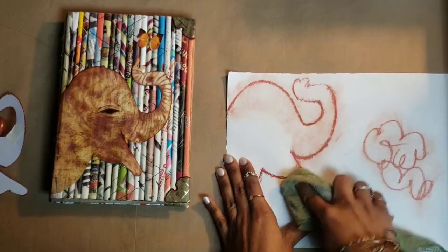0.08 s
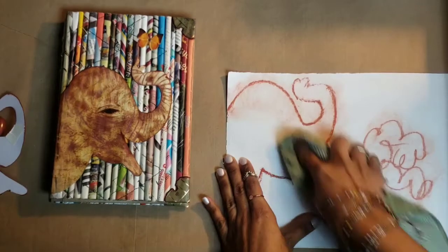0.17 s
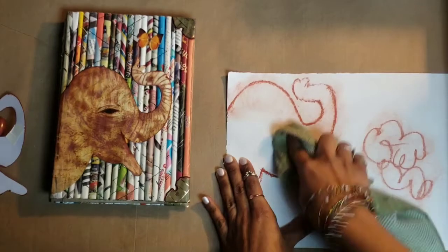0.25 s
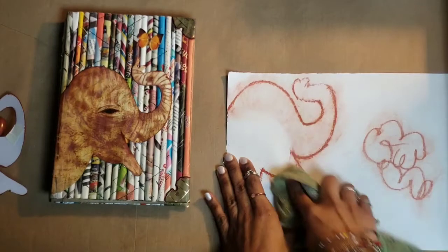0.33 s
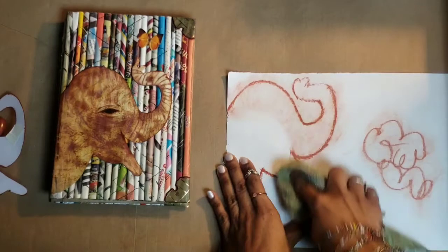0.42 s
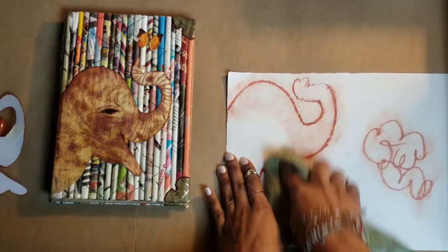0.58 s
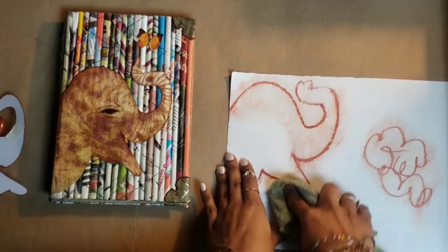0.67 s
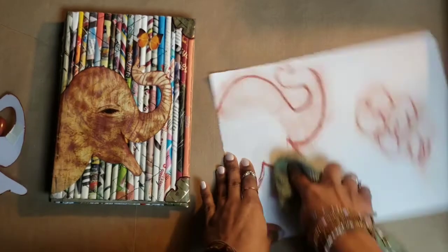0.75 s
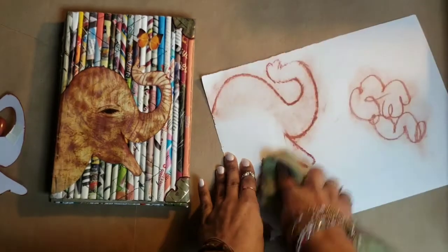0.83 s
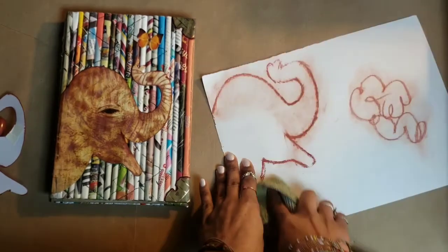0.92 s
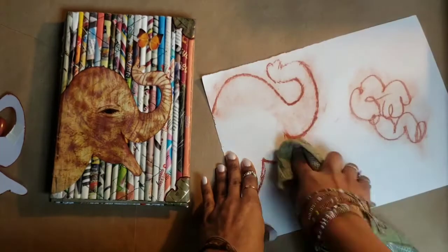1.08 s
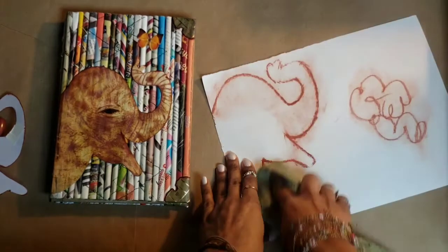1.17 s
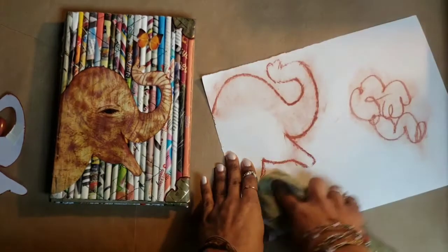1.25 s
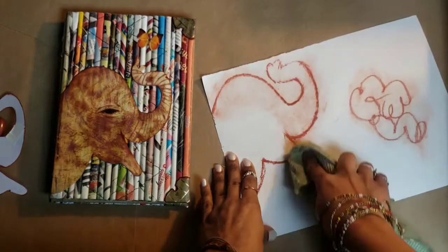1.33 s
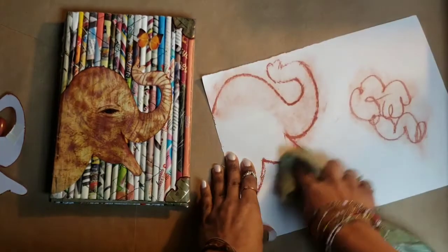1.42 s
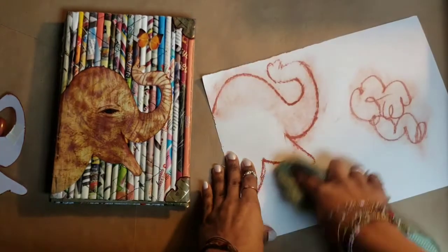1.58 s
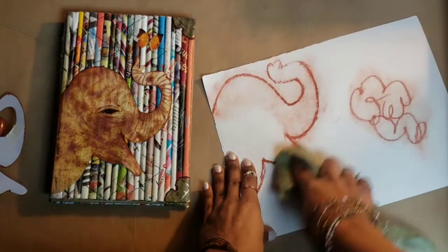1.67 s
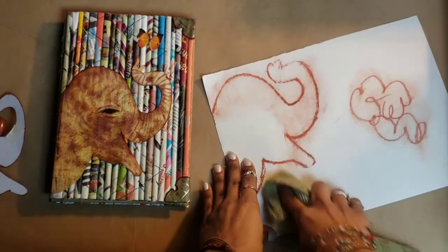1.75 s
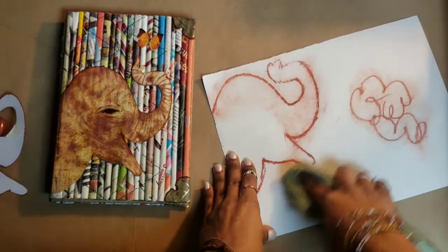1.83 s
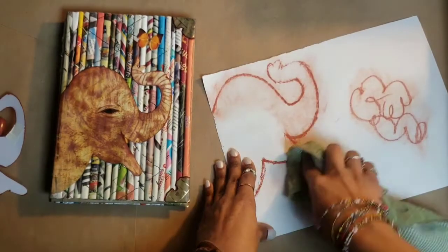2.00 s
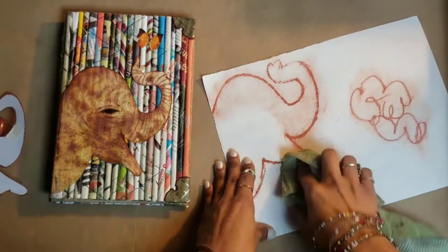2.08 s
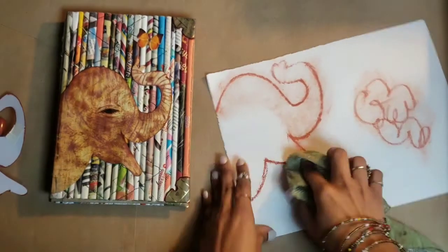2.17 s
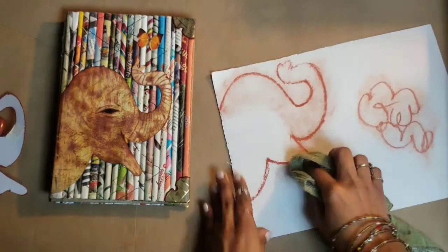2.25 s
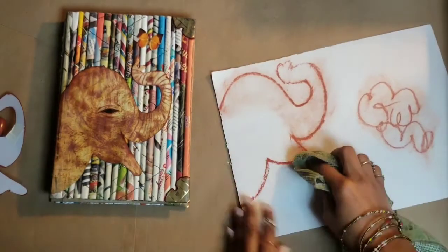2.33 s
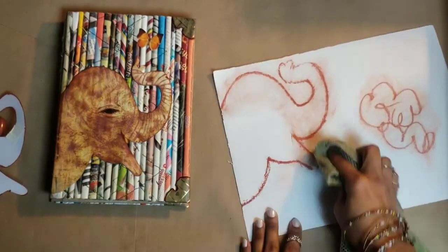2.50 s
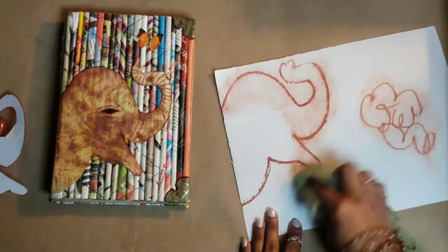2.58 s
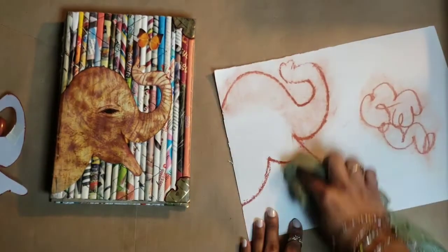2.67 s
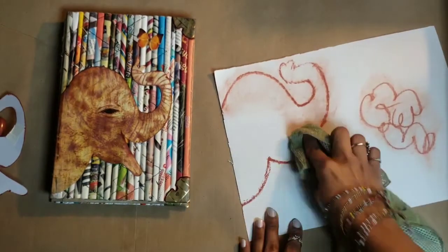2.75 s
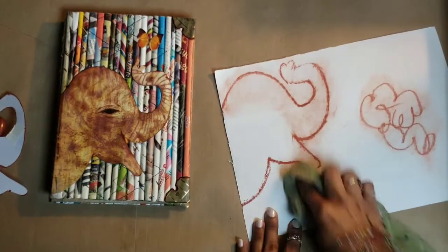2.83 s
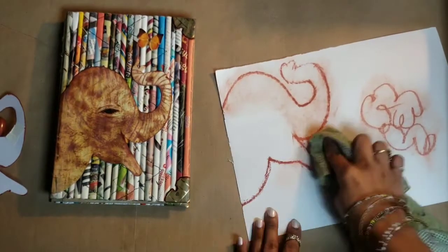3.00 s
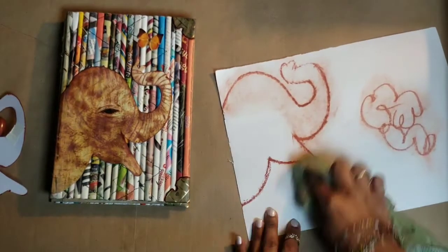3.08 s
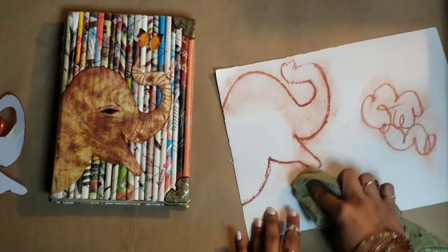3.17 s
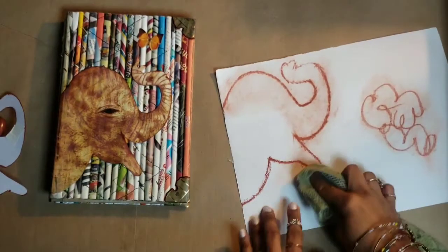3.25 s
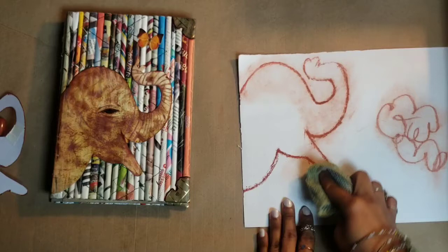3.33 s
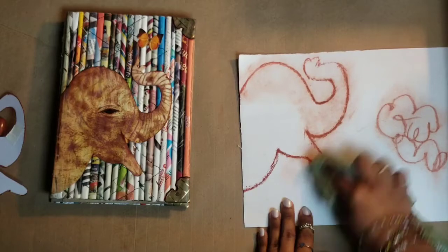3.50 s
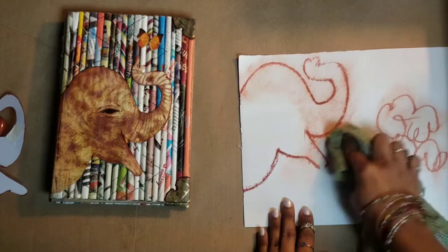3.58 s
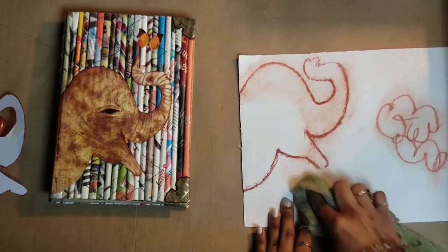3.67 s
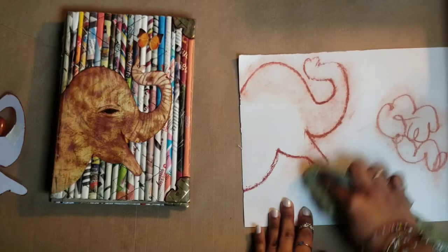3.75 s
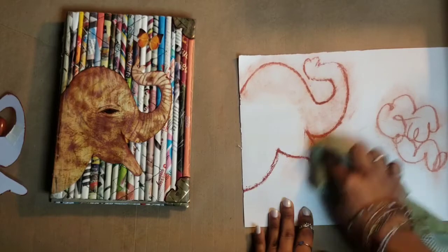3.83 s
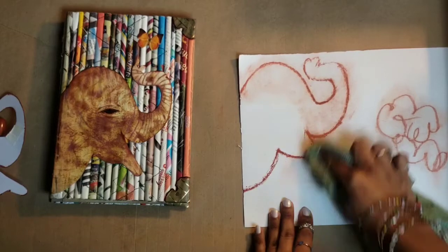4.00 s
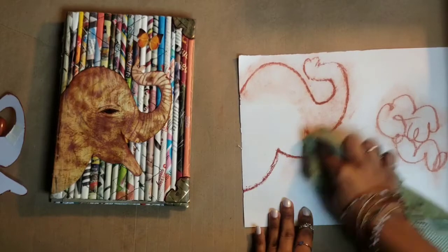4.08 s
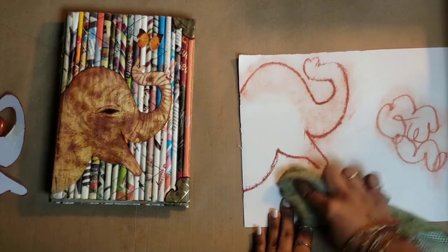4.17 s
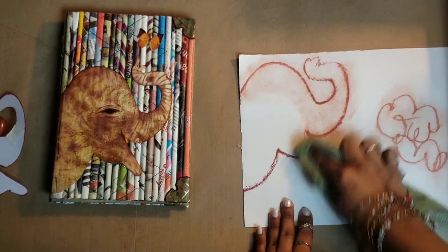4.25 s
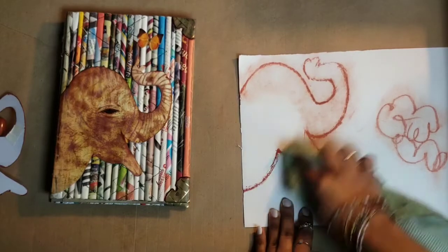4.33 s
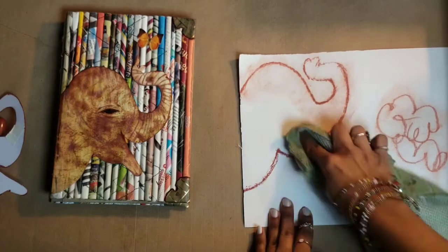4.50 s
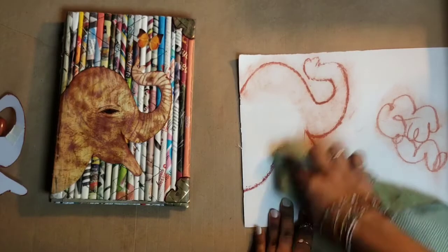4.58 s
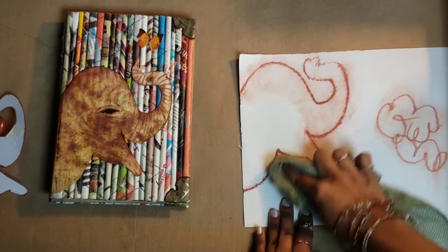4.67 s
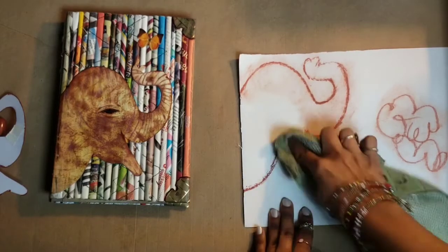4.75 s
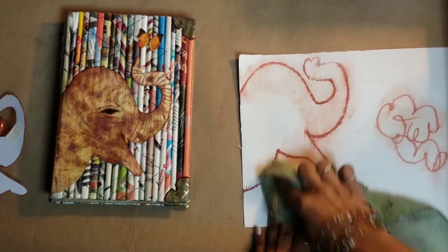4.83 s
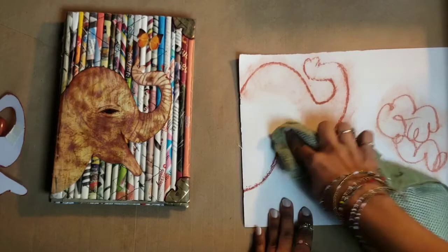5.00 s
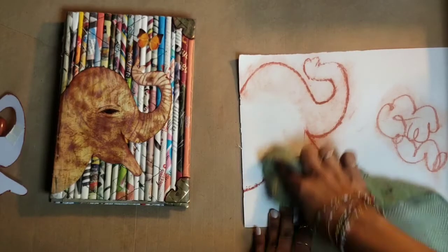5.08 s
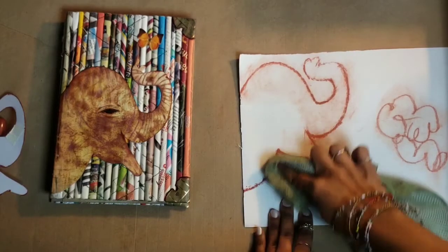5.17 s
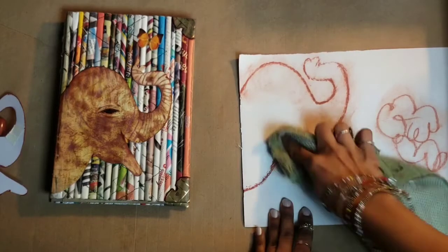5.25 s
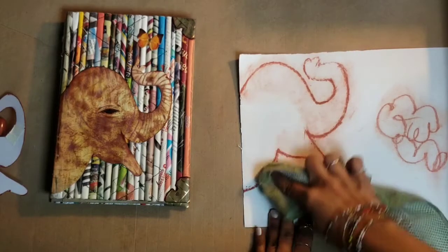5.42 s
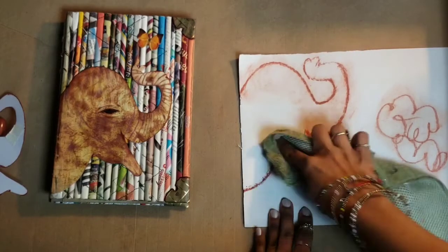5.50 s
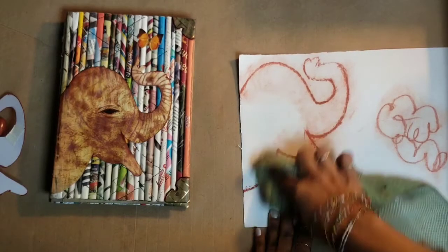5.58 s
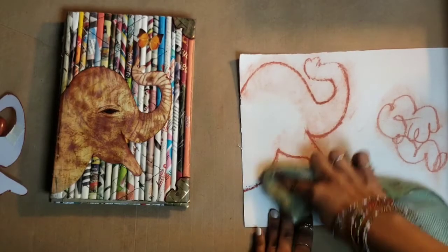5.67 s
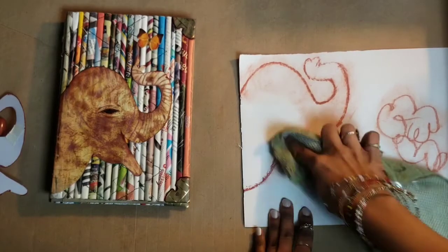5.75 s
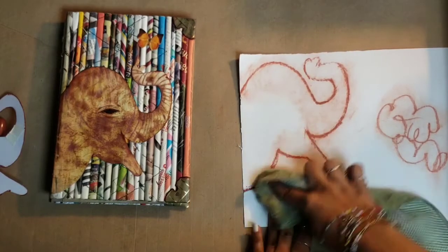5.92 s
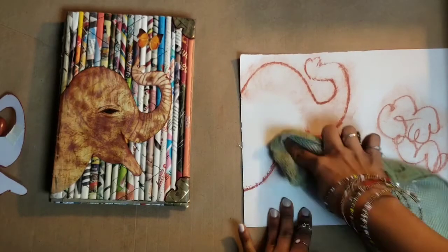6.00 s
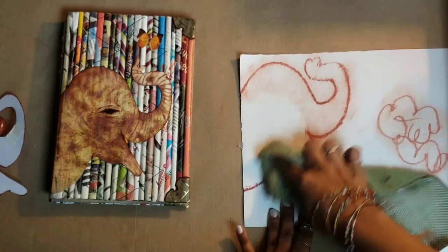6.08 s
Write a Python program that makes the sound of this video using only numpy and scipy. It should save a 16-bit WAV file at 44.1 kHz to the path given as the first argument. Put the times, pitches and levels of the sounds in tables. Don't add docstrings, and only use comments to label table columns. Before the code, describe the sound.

Heard closely in stereo in a small, hard room with faint low rumble: a bunched cloth scrubs paper on a wooden table. From 0 s, airy, bright, grainy strokes swell and fade several times a second, the table droning softly beneath. At about 0.42 s a hard, cracking hand slap hits the wood in a tight cluster; thin bangles tick sharply near 0.8 and 0.9 s. From 1 to 2.5 s the rubbing drops much quieter, with faint bumps. Around 2.6 s firm strokes return, louder and steadier, with small knuckle knocks from 3.07 s and a low jolt of the table at 3.33 s. At 4.2 s a duller, fleshy double-edged thump lands, with another knock at 4.56 s. Scrubbing continues to about 6.1 s, quick and slightly hollow, alternating stronger and weaker strokes, with bangle ticks near 5 and 5.6 s.

```python
import sys
import numpy as np
from scipy import signal
from scipy.fft import rfft, irfft, next_fast_len
from scipy.io import wavfile
from scipy.ndimage import uniform_filter1d

SR = 44100
rng = np.random.default_rng(int(sys.argv[2]) if len(sys.argv) > 2 else 0)


def dump_mix(stems):
    frames = np.atleast_2d(stems).T
    limited = np.clip(frames, -1, 1)
    pcm = np.round(limited * 32767).astype(np.int16)
    wavfile.write(sys.argv[1], SR, pcm)


def field_ratio(decibels):
    return 10 ** (np.asarray(decibels, dtype=float) / 20)


N = 270333
TIME = np.arange(N) / SR
BINS_HZ = np.fft.rfftfreq(next_fast_len(N), 1 / SR) + 1

# top_speed_s, speeding_up_s, slowing_down_s, hiss_db,
# fizz_re_hiss_db
STROKES = [(0.018, 0.063, 0.1, -40, 2), (0.132, 0.048, 0.11, -43.5, 2.5),
           (0.319, 0.089, 0.068, -40.5, 2.5), (0.479, 0.12, 0.068, -39, -3.5),
           (0.584, 0.054, 0.095, -40.5, 1.5), (0.746, 0.065, 0.066, -37.0, 5.5),
           (0.843, 0.04, 0.1, -44, 3.0), (0.915, 0.019, 0.042, -43.5, 2.5),
           (1.063, 0.12, 0.054, -50, 4.5), (1.167, 0.067, 0.082, -49, 6),
           (1.327, 0.086, 0.073, -46, 3.0), (1.424, 0.062, 0.11, -49.5, 4),
           (1.574, 0.053, 0.079, -47, 4), (1.722, 0.064, 0.078, -46.0, 4.5),
           (1.863, 0.14, 0.12, -45.0, 2.0), (2.093, 0.12, 0.049, -46.5, 3),
           (2.196, 0.1, 0.15, -49, 1.5),
           (2.433, 0.098, 0.12, -52.5, 4.7), (2.605, 0.16, 0.026, -40.5, 2.2),
                (2.683, 0.089, 0.096, -37.5, 1.6), (2.853, 0.098, 0.049, -35.5, 2.4),
                (2.942, 0.15, 0.1, -39.5, 2.6), (3.073, 0.049, 0.12, -38, 2.4),
                (3.357, 0.15, 0.065, -43, 3.0), (3.419, 0.052, 0.084, -44.5, 1.8),
                (3.502, 0.065, 0.092, -40.0, 4.6), (3.662, 0.087, 0.044, -38.0, 2.9),
                (3.755, 0.088, 0.076, -40.0, 3.7), (3.901, 0.081, 0.029, -38.5, 3.6),
                (3.986, 0.114, 0.085, -40, 2.9), (4.136, 0.08, 0.037, -40.5, 3.4),
                (4.231, 0.137, 0.077, -41, 0.5),
           (4.374, 0.07, 0.036, -40.5, 2.4), (4.434, 0.039, 0.13, -42.5, 1.6),
                 (4.58, 0.043, 0.19, -42, 2.2), (4.718, 0.072, 0.082, -45, 0.0),
                 (4.823, 0.049, 0.078, -42, 0.78), (4.99, 0.22, 0.046, -43.5, 3.8),
                 (5.062, 0.031, 0.1, -37, -0.5), (5.23, 0.12, 0.066, -43.5, 1.2),
                 (5.335, 0.058, 0.1, -37, -1.0), (5.47, 0.14, 0.11, -43.5, 0.16),
                 (5.605, 0.065, 0.05, -38, -1.1), (5.678, 0.049, 0.154, -42, 0.16),
                 (5.834, 0.044, 0.082, -41.0, 1.5), (5.988, 0.24, 0.052, -44, -0.31),
                 (6.13, 0.2, 0.02, -43, 1.0)]
CREEP_DB, CREEP_FIZZ_DB = -60.5, -11


def strokes():
    hiss_power = np.ones(N) * field_ratio(CREEP_DB) ** 2
    fizz_power = np.ones(N) * field_ratio(CREEP_DB + CREEP_FIZZ_DB) ** 2
    for top_s, rise_s, fall_s, hiss_db, fizz_db in STROKES:
        start_s, end_s = top_s - rise_s, top_s + fall_s
        span = slice(max(int(start_s * SR), 0), int(end_s * SR))
        away = np.interp(TIME[span], [start_s, top_s, end_s], [1, 0, 1])
        power = (field_ratio(hiss_db) * np.cos(away * np.pi / 2)) ** 2
        hiss_power[span] += power
        fizz_power[span] += power * field_ratio(fizz_db) ** 2
    return np.sqrt(hiss_power), np.sqrt(fizz_power)


# freq_hz, level_db
FIBRE_SPECTRUM = [(700, -24), (1000, 12), (1500, -15.5), (1900, -14), (2250, -7), (2900, -7.5), (4200, -4),
                  (5200, -5.5), (7000, -4.5), (8700, -6.5), (10500, -4.5), (12000, -2.5), (14200, -1.5),
                  (15600, -8)]
FIBRE_ALIKE = 0.095
TOWEL_DB, SCRAPE_DB, MUTTER_DB = 3, -18, -26


def towel(hiss, fizz, grip_db):
    grains = colour(pair(FIBRE_ALIKE, scatter_db=5.0), FIBRE_SPECTRUM)
    edges_hz = [800, 1430, 2050, 3400, 5800, 8500, 12000, 20000]
    patches = []
    for band_hz in zip(edges_hz, edges_hz[1:]):
        patch = signal.sosfilt(signal.butter(5, band_hz, "band", fs=SR, output="sos"), grains)
        patches.append(patch * field_ratio(1.8 * walk(15) + 0.5 * walk(54)))
    scrape = field_ratio(SCRAPE_DB + grip_db) * level(patches[1])
    mutter = field_ratio(MUTTER_DB) * level(patches[0])
    other_grains = np.roll(grains, SR, axis=1)
    body = scrape + mutter + level(sum(patches[2:4])) + hollows(other_grains)
    fine = level(sum(patches[4:]))
    return field_ratio(TOWEL_DB + 2.0 * walk(60)) * (hiss * body + fizz * fine)


# start_s, end_s, pitch_hz, width_hz, level_re_hiss_db
HOLLOWS = [
    (2.453, 3.05, 1730, 292, -15),
    (4.548, 6.2, 2220, 350, -11.5),
    (4.938, 6.2, 4380, 870, -11),
]
HOLLOW_FADE_S = 0.16


def hollows(grains):
    out = 0
    for start_s, end_s, hz, width_hz, db in HOLLOWS:
        turns_s = [start_s - HOLLOW_FADE_S, start_s, end_s, end_s + HOLLOW_FADE_S]
        held = np.interp(TIME, turns_s, [0, 1, 1, 0])
        band_hz = [hz - width_hz / 2, hz + width_hz / 2]
        band = signal.butter(2, band_hz, "band", fs=SR, output="sos")
        out = out + held * field_ratio(db + 8.6 * walk(23)) * level(signal.sosfilt(band, grains))
    return out


# freq_hz, density_db_per_hz
BOOM_SPECTRUM = [(12, -33), (20, -53), (59, 0), (81, -7.5), (112, 4.5), (145, -7), (167, -9), (229, -19.5),
                 (255, -21.5), (330, -20), (430, -50), (730, -120)]
DRONE_SPECTRUM = [(150, -59), (250, 3), (416, 7.5), (469, -1), (678, 0), (949, 1.5), (1500, 2), (1950, -67),
                  (3300, -120)]
BOOM_ALIKE, DRONE_ALIKE = 0.89, 0.65
BOOM_DB, BOOM_PER_LEAN, DRONE_DB, DRONE_PER_LEAN = -50, 0.38, -56.5, 0.65
STROKE_DB = -42
BOOM_PER_STROKE, DRONE_PER_STROKE = 0.18, 0.33


def table_top(hiss, lean_db):
    stroke = hiss / field_ratio(STROKE_DB)
    boom_gain = field_ratio(BOOM_DB + BOOM_PER_LEAN * lean_db + 2.5 * walk(12)) * stroke ** BOOM_PER_STROKE
    drone_gain = field_ratio(DRONE_DB + DRONE_PER_LEAN * lean_db + 2.5 * walk(25)) * stroke ** DRONE_PER_STROKE
    boom = level(colour(pair(BOOM_ALIKE), BOOM_SPECTRUM))
    drone = level(colour(pair(DRONE_ALIKE), DRONE_SPECTRUM))
    return boom_gain * boom + drone_gain * drone


# freq_hz, level_db, t60_s
THUD = [(100.5, -6, 0.38), (131.3, -27, 0.93), (147.3, 6.5, 0.13), (189, -0.5, 0.19), (220, -3, 0.2)]
RING = [(269, 1, 0.074), (366, 7, 0.11), (424, 1.5, 0.089), (460, 2, 0.035), (510, 6, 0.038),
        (634.3, -4, 0.041), (750, -5, 0.035)]
CLACK = [(820, -29, 0.065), (1040, -23, 0.046), (1093, -3, 0.053), (1223, 5, 0.05), (1350, 7, 0.058),
         (1570, -2, 0.037), (1810, -6, 0.039)]
RATTLE = [(1800, -1, 0.0039), (2214, -7, 0.025), (2740, -10.5, 0.045), (3060, -0.5, 0.0075),
          (3580, 5.5, 0.00099), (5100, 2.5, 0.0032), (6300, 12.5, 0.0014), (11100, 14.5, 0.00093),
          (14900, 13, 0.001)]
KNOCK_LAG, KNOCK_WET_DB = 10, -1.5


def knocks(blows, ring_db, ring_per_flesh, rattle_db, rattle_per_flesh, free, lift_db_per_octave):
    out = np.zeros((2, N + SR))
    t = TIME[:SR // 3]
    fade = np.cos(1.5 * np.pi * t)
    clack = [(hz, db, free * t60_s) for hz, db, t60_s in CLACK]
    body = []
    for hz, db, t60_s in RING:
        octaves = np.log2(hz / RING[0][0])
        body.append((hz, db + lift_db_per_octave * octaves, free * t60_s))
    for start_s, clack_db, flesh_db, contact_s in blows:
        press = 1 - np.exp(-t / (0.34 * contact_s))
        force = rng.standard_normal(len(t)) * press * np.exp(-t / contact_s)
        families = [(clack, 0), (THUD, flesh_db), (body, ring_db + ring_per_flesh * flesh_db),
                    (RATTLE, rattle_db + rattle_per_flesh * flesh_db)]
        sound = 0
        for modes, share_db in families:
            part = ring(force, modes)
            sound = sound + field_ratio(share_db) * part / abs(part).max()
        heard = room(sound * fade, KNOCK_LAG, KNOCK_WET_DB)
        out[:, int(start_s * SR):][:, :len(t)] += field_ratio(clack_db) * heard
    return signal.lfilter(*signal.butter(2, 70, "high", fs=SR), out[:, :N])


# start_s, clack_db, flesh_db, contact_s
SLAP = [
    (0.419, -16.5, -34.5, 0.021),
    (0.431, -17, -17, 0.0033),
    (0.438, -22, 0, 0.0091),
    (0.449, -27.5, 2, .011),
    (0.462, -37, 8, 0.014),
]
THUMP = [
    (4.214, -34, 2.5, 0.0092),
    (4.226, -30.5, 5.5, 0.014),
    (4.241, -35.5, 6.5, 0.018),
    (4.257, -28, -8, 0.0048),
    (4.287, -47, 11, 0.023),
    (4.33, -55, 11.5, 0.056),
]
KNOCKS = [(0.18, -40, 4, 0.0046), (0.25, -66, 26.5, 0.033), (0.489, -41.5, 13, 0.019),
          (0.53, -47, 19, 0.024), (0.693, -46.5, 8, 0.01), (0.825, -49.5, 11, 0.017),
          (1.559, -63, 19.5, 0.014), (1.823, -50, 11, 0.038), (2.391, -46.5, 6, 0.005),
          (2.423, -51.5, 22.5, 0.01), (2.45, -55, 18, .02), (2.498, -58, 20, 0.0067),
          (3.068, -33.5, -3.5, 0.011), (3.146, -47.5, 1, 0.02), (3.327, -37, 10.5, 0.008),
          (3.621, -35, -1.5, 0.0081), (3.698, -41.5, 0, 0.024), (3.87, -40, 5, 0.017),
          (3.952, -41, -1, 0.017), (4.086, -61.5, 23, 0.0093), (4.166, -45.5, -3, 0.1),
          (4.439, -44, 0, 0.018), (4.562, -29, -4.5, 0.0042), (4.799, -38, -1, 0.012),
          (4.82, -39, 5.5, 0.0086), (5.329, -33, -5, 0.0059), (5.463, -43.5, -9, 0.0049),
          (5.504, -54.5, 15.5, 0.021), (5.553, -49, 16, 0.014), (5.907, -37, -2.5, 0.0052)]
BLOW_PAN_DB = -1.5


def hand_blows():
    slap = knocks(SLAP, ring_db=4.5, ring_per_flesh=1.6, rattle_db=5, rattle_per_flesh=-0.25,
                  free=0.6, lift_db_per_octave=20)
    thump = knocks(THUMP, ring_db=6, ring_per_flesh=0.79, rattle_db=-0.5, rattle_per_flesh=1.32,
                   free=0.7, lift_db_per_octave=11)
    other_knocks = knocks(KNOCKS, ring_db=0.17, ring_per_flesh=0.76, rattle_db=10.7, rattle_per_flesh=0.39,
                      free=0.3, lift_db_per_octave=-1.3)
    pan = field_ratio(np.array([[BLOW_PAN_DB], [-BLOW_PAN_DB]]) / 2)
    return pan * (slap + thump + other_knocks)


# start_s, peak_db, pitch_hz, t60_s, snap_db
TICKS = [(0.2911, -26.5, 2650, 0.031, -18), (0.295, -32, 2780, 0.025, -24), (0.6945, -35, 3020, 0.0087, 15),
         (0.7981, -15, 2850, 0.0091, 3), (0.805, -27, 2700, 0.013, -1), (0.9015, -34, 3000, .005, 7),
         (0.9148, -16, 3900, 0.0073, 2), (0.9163, -12, 2450, 0.0093, -1), (.9300, -36, 4340, .008, -10),
         (1.3972, -28, 1536, 0.044, -24), (2.0402, -32.5, 1770, 0.018, -22.5),
         (4.5627, -27, 2300, 0.0076, -13), (4.9905, -32, 2660, .006, 8), (4.9891, -19, 2600, 0.015, 3),
         (4.989, -25, 2740, 0.011, 22.5), (4.997, -24, 2660, 0.013, 2), (5.0423, -24, 3140, 0.012, 5),
         (5.593, -22, 4070, 0.038, -17)]
# freq_hz, level_db, t60_s
SNAP = [(4700, -7, 0.00099), (6060, -4, 0.0021), (7650, -6, .003), (12800, 2, 0.0042), (14600, -14, 0.0034)]
TICK_LAG, TICK_WET_DB = 2, -5


def bangles():
    out = np.zeros((2, N + SR))
    touch = np.eye(1, SR // 5)[0]
    snap = ring(touch, SNAP)
    for start_s, peak_db, hz, t60_s, snap_db in TICKS:
        modes = [(hz, 0, np.clip(t60_s, 0.003, 0.03)), (0.72 * hz, -6, 0.005), (1.16 * hz, -5, 0.004)]
        tone = ring(touch, modes)
        tick = field_ratio(snap_db) * snap / abs(snap).max() - tone / abs(tone).max()
        heard = room(tick, TICK_LAG, TICK_WET_DB)
        out[:, int(start_s * SR):][:, :len(touch)] += field_ratio(peak_db) * heard
    return signal.lfilter(*signal.butter(4, 1250, "high", fs=SR), out[:, :N])


JOLT_S, JOLT_DB, JOLT_HZ, JOLT_T60_S = 3.327, -30, 36, 0.15


def jolt():
    t = np.maximum(TIME - JOLT_S, 0)
    return field_ratio(JOLT_DB) * np.sin(2 * np.pi * JOLT_HZ * t) * np.exp(-np.log(1000) * t / JOLT_T60_S)


ROOM_T60_S, ROOM_DULL_HZ = 0.11, 6700


def room(x, lag, wet_db):
    t = TIME[:len(x)]
    decay = np.exp(-np.log(1000) * t / ROOM_T60_S) * (1 - np.exp(-t / 0.00025))
    echoes = rng.standard_normal((2, len(t))) * decay
    echoes = signal.lfilter(*signal.butter(1, ROOM_DULL_HZ, fs=SR), echoes)
    echoes = echoes / np.sqrt(np.sum(echoes ** 2) / 2)
    sent = signal.lfilter(*signal.butter(2, 600, "high", fs=SR), x)
    wet = signal.fftconvolve(sent[None], echoes, axes=1)[:, :len(t)]
    return np.array([np.roll(x, lag), x]) + field_ratio(wet_db) * wet


# freq_hz, density_db_per_hz
AIR_SPECTRUM = [(12, -61), (24, -12.5), (45, -5.5), (120, -34)]
AIR_DB, AIR_ALIKE = -54.5, 0.43


def building():
    return field_ratio(AIR_DB) * level(colour(pair(AIR_ALIKE), AIR_SPECTRUM))


def level(x):
    return x / np.sqrt(np.mean(x ** 2))


def curves(table):
    s, *columns = np.transpose(table)
    return [np.interp(TIME, s, c) for c in columns]


def colour(x, table):
    hz, db = np.transpose(table)
    gain = field_ratio(np.interp(np.log(BINS_HZ), np.log(np.maximum(hz, 1)), db))
    size = next_fast_len(N)
    return irfft(rfft(x, size) * gain, size)[..., :N]


def walk(rate_hz):
    k = int(SR / rate_hz)
    held = np.repeat(rng.standard_normal(N // 100), k)[:N]
    return 0.39 * uniform_filter1d(uniform_filter1d(held, k), k)


PORT_LAG = 4


def pair(alike, scatter_db=0.0):
    scatter = np.minimum(rng.exponential(size=(3, N)), 3.5)
    shared, left, right = rng.standard_normal((3, N)) * field_ratio(scatter_db * scatter)
    common = np.array([np.roll(shared, PORT_LAG), shared])
    return np.sqrt(alike) * common + np.sqrt(1 - alike) * np.array([left, right])


def ring(force, modes):
    out = 0
    for hz, db, t60_s in modes:
        pole = np.exp(2j * np.pi * hz / SR - np.log(1000) / (t60_s * SR))
        out = out + field_ratio(db) * signal.lfilter([1], [1, -pole], force).imag
    return out


# time_s, lean_on_board_db, grip_on_paper_db
HAND = [(0, 3.5, 4.5), (.4, 3, 0), (.62, 12, 4), (.9, 0, -4), (1.05, -11, -2), (1.4, 4.5, 5.5),
        (1.7, -12, 0), (2.0, -7.5, 9), (2.3, 13, 12), (2.6, -7, 7), (3.0, -3.5, 3.5), (3.4, 1.5, 3.5),
        (3.8, 2, 1.5), (4.15, -4.5, -0.5), (4.36, 2, 0), (4.6, 8.5, 4), (5.2, -8, 6.5), (6.13, -1.5, 1.5)]


def scene():
    hiss, fizz = strokes()
    lean_db, grip_db = curves(HAND)
    rubbing = towel(hiss, fizz, grip_db) + table_top(hiss, lean_db)
    return rubbing + hand_blows() + bangles() + jolt() + building()


def low_pass(x):
    return signal.sosfilt(signal.butter(12, 16810, fs=SR, output="sos"), x)


# freq_hz, left_minus_right_db
PORT_PAN = [(60, 1), (110, 0.5), (200, 0.0), (380, 0.5), (700, 1.5), (1290, 1), (2380, 0.5), (4400, 2),
            (8120, 2), (15000, -4.5)]
# freq_hz, level_db
TOP_CUT = [(15600, 0), (15700, -100)]
CEILING = 1.1


def record(dry):
    left = colour(dry[0], [(hz, db / 2) for hz, db in PORT_PAN])
    right = colour(dry[1], [(hz, -db / 2) for hz, db in PORT_PAN])
    rounded = CEILING * np.tanh(np.array([left, right]) / CEILING)
    mix = colour(rounded, TOP_CUT)
    return low_pass(mix)


dry = scene()
out = record(dry)
dump_mix(out)
```